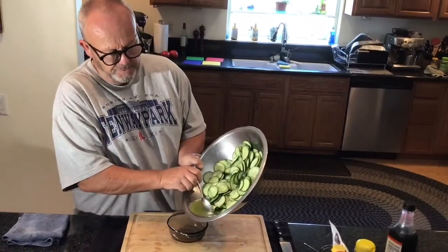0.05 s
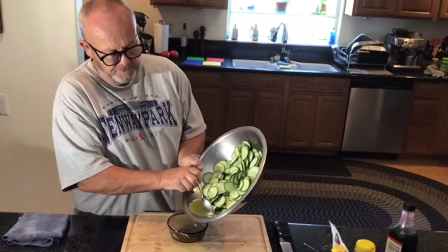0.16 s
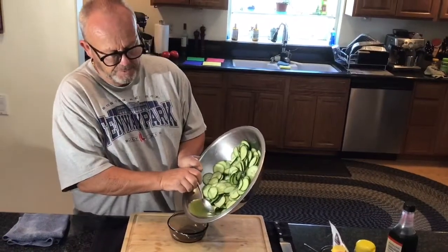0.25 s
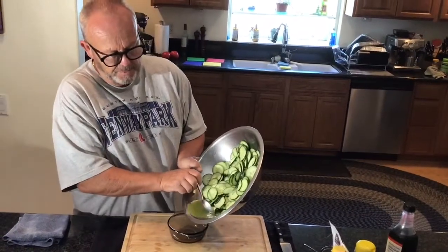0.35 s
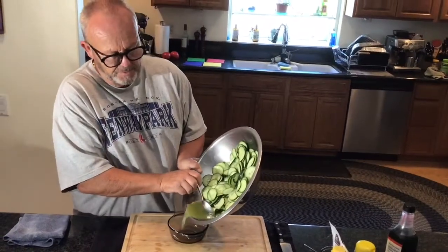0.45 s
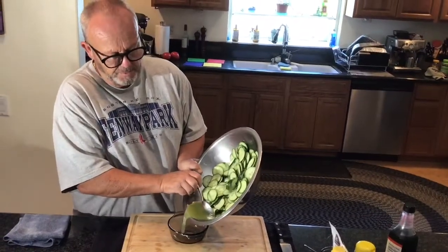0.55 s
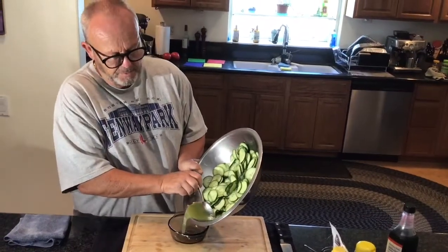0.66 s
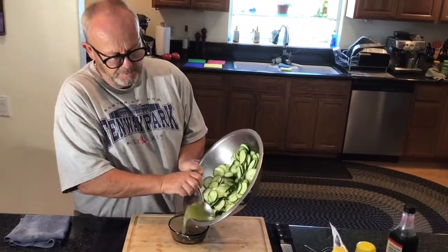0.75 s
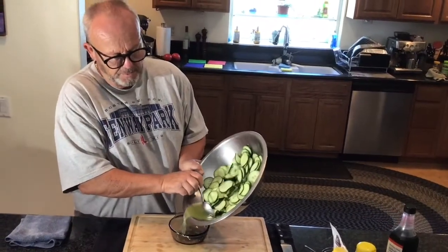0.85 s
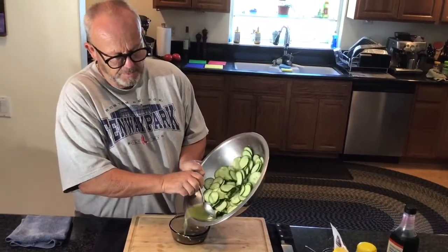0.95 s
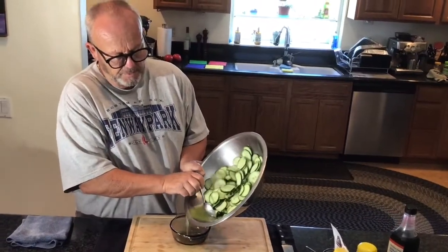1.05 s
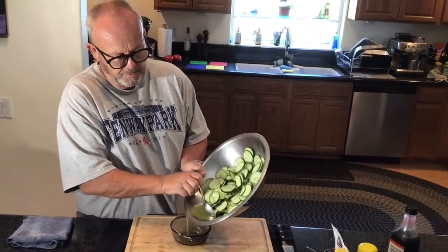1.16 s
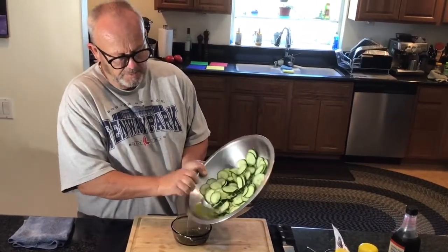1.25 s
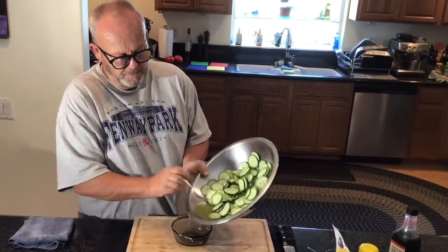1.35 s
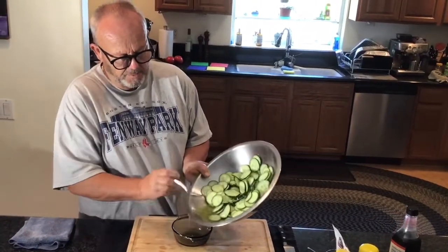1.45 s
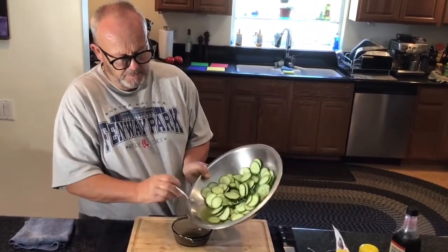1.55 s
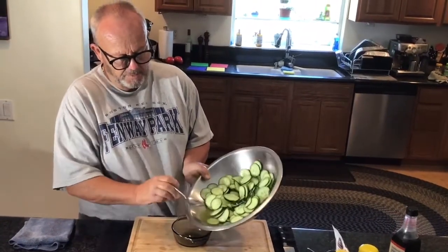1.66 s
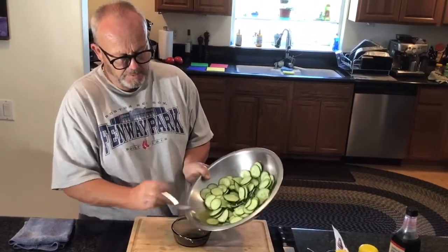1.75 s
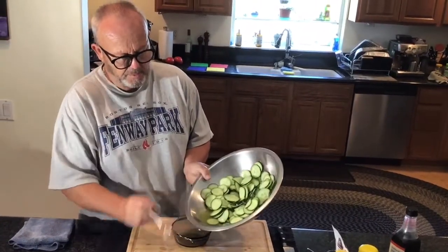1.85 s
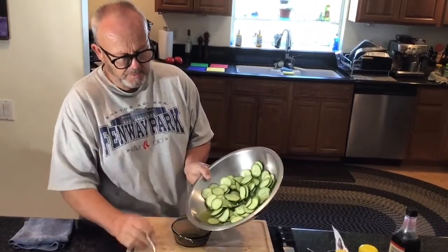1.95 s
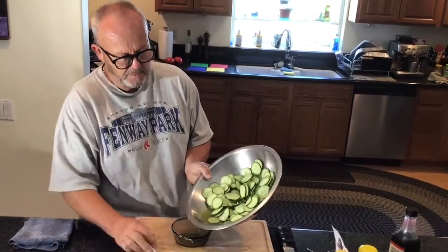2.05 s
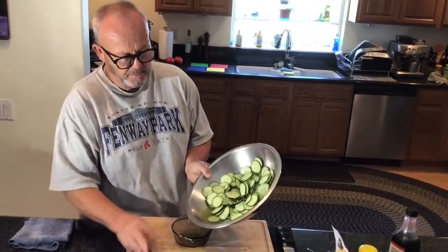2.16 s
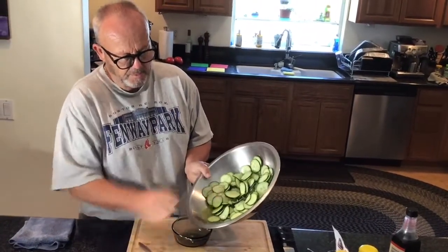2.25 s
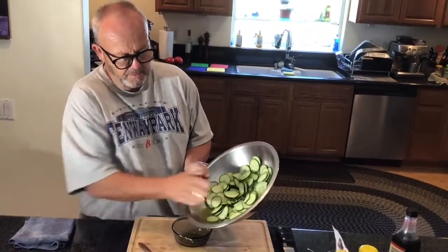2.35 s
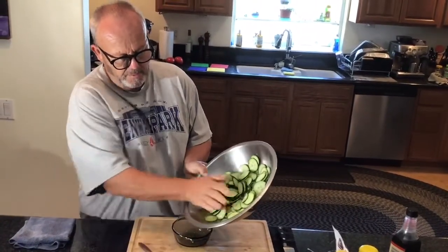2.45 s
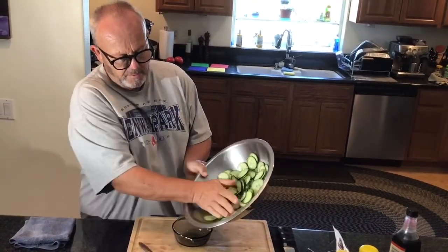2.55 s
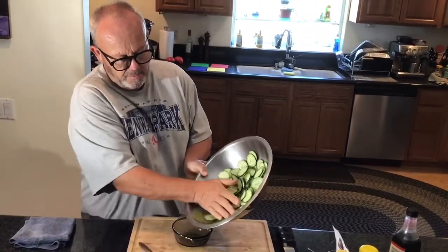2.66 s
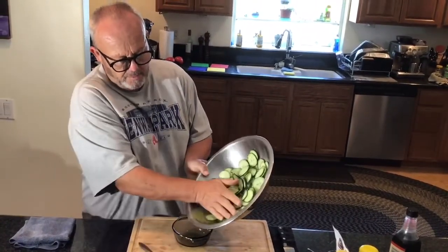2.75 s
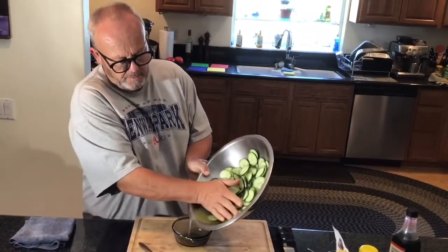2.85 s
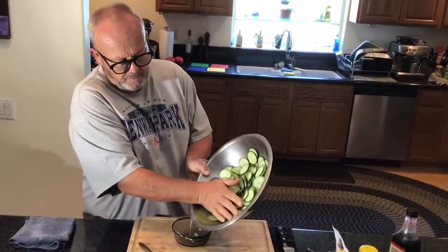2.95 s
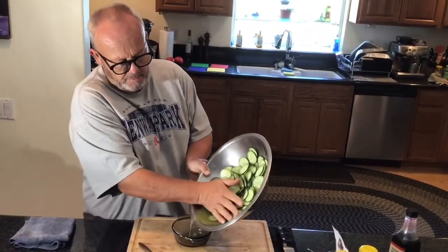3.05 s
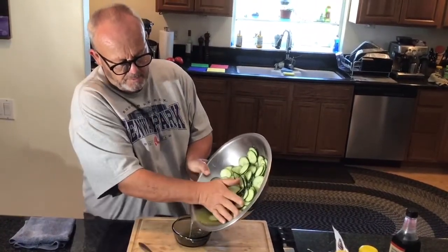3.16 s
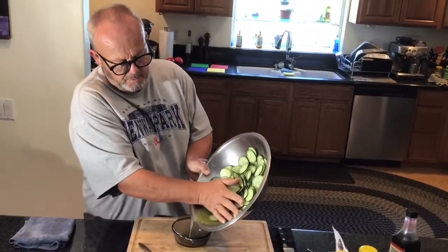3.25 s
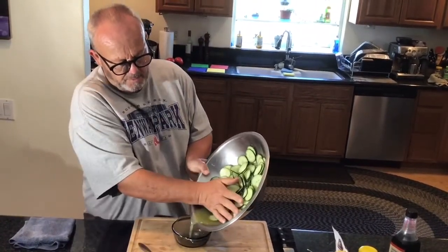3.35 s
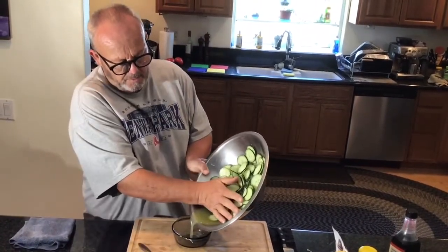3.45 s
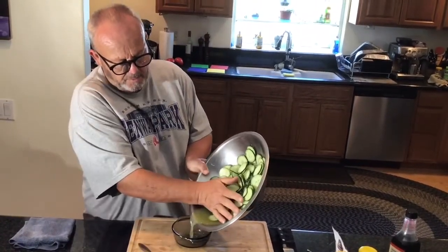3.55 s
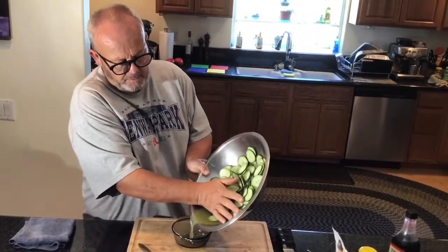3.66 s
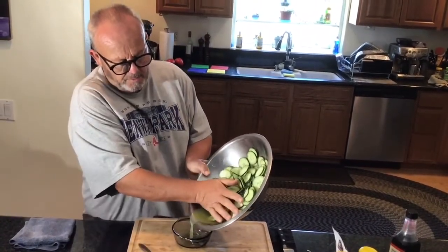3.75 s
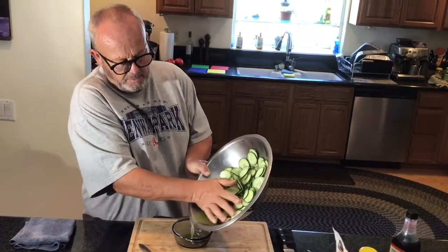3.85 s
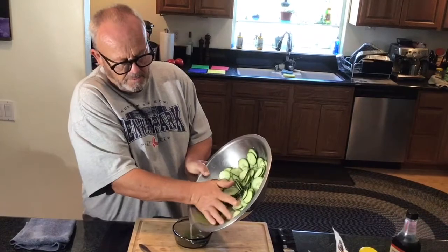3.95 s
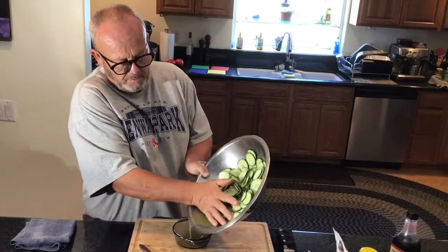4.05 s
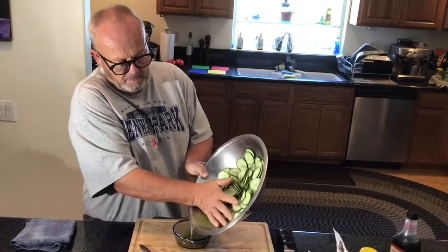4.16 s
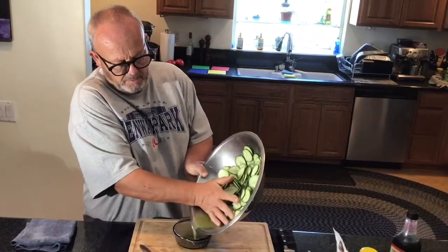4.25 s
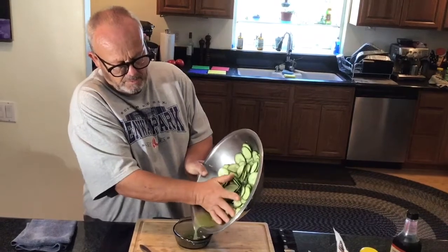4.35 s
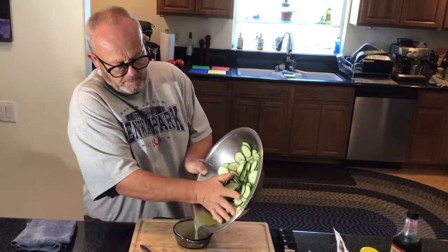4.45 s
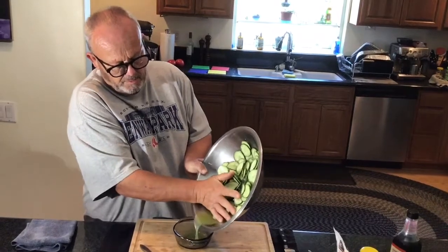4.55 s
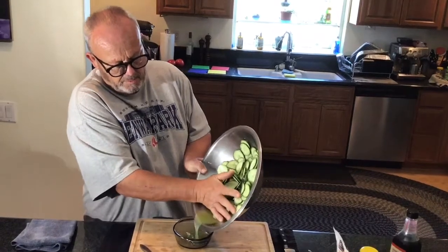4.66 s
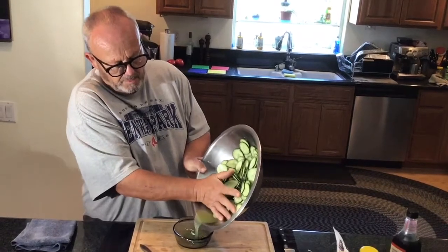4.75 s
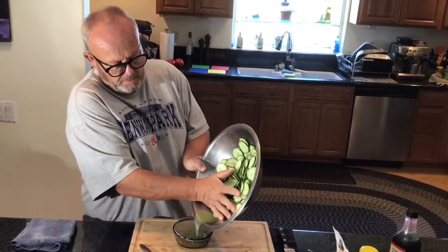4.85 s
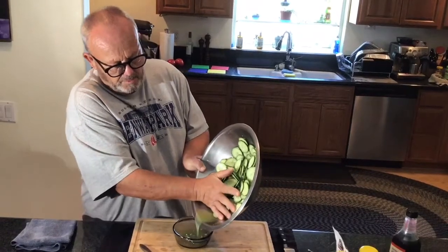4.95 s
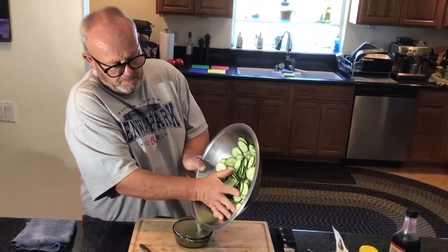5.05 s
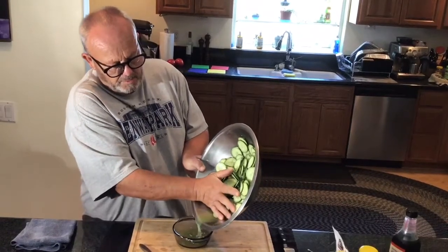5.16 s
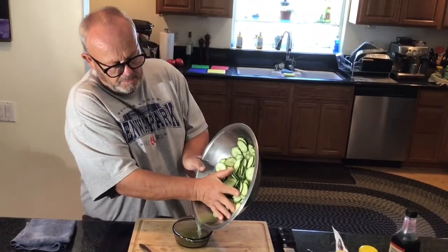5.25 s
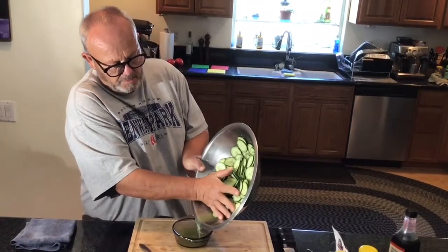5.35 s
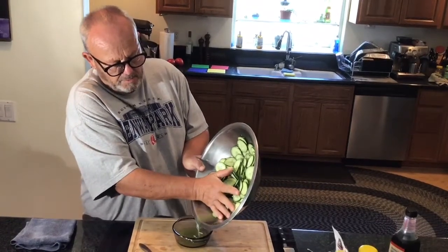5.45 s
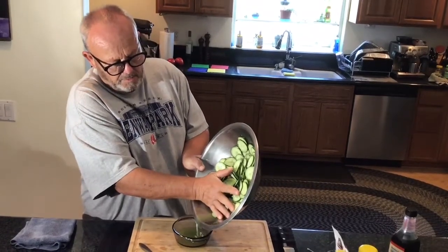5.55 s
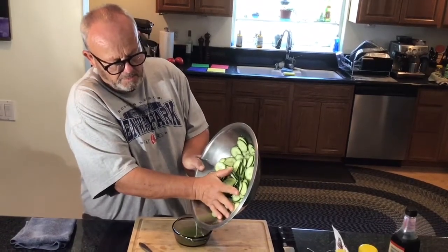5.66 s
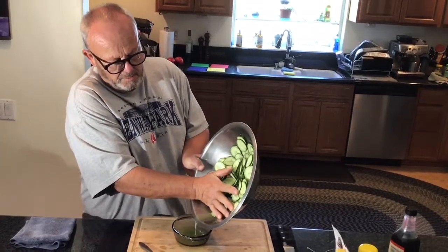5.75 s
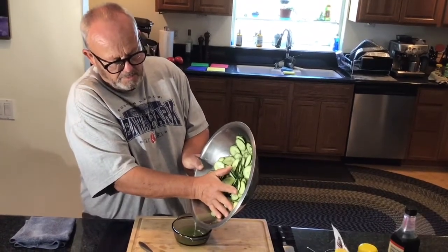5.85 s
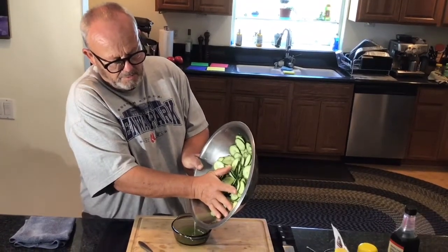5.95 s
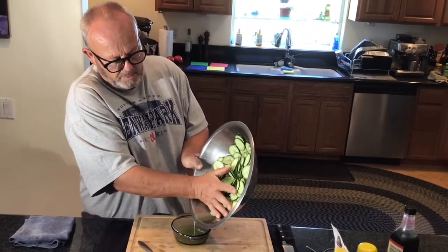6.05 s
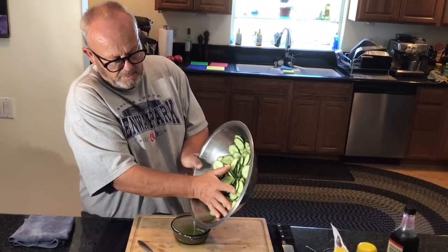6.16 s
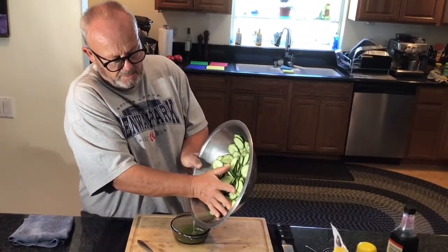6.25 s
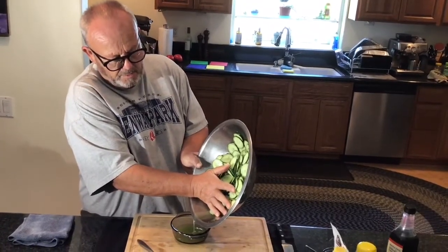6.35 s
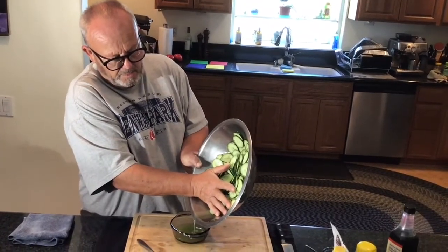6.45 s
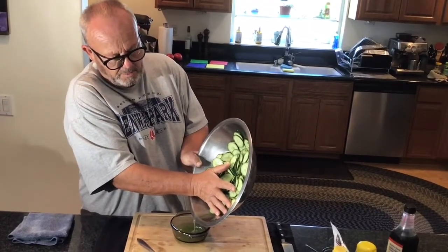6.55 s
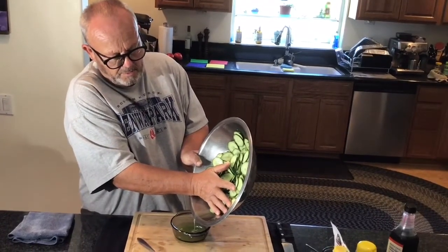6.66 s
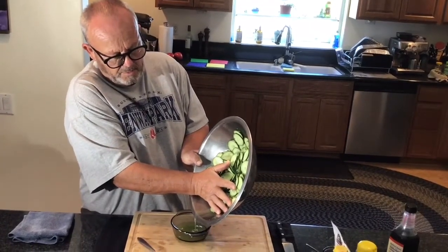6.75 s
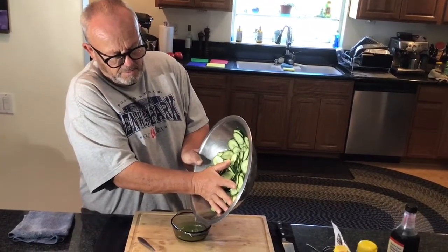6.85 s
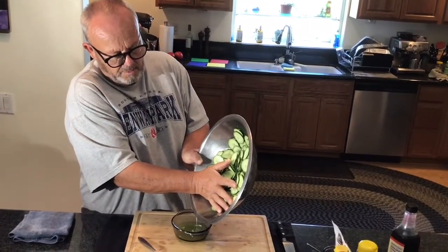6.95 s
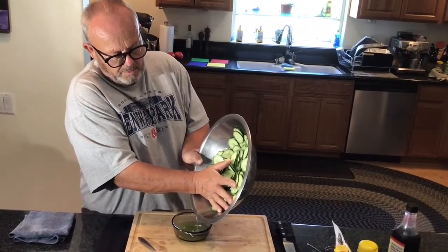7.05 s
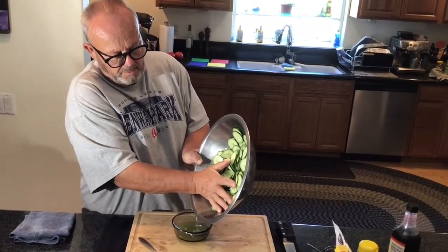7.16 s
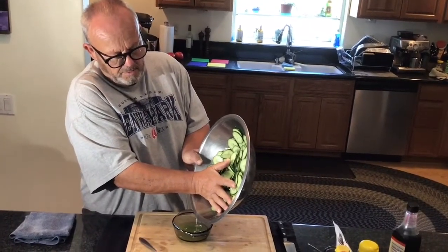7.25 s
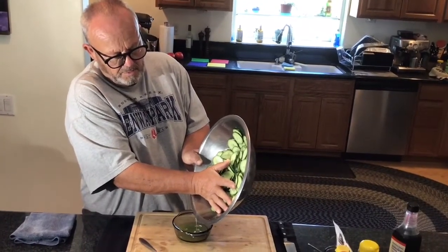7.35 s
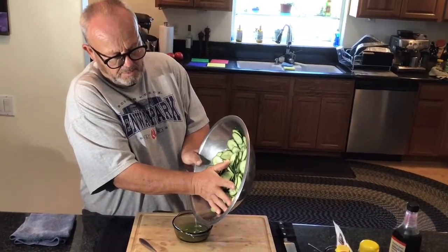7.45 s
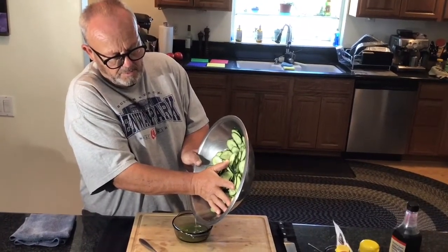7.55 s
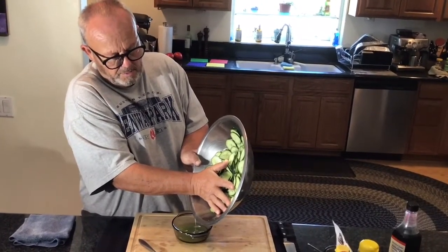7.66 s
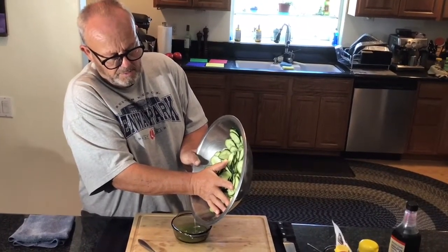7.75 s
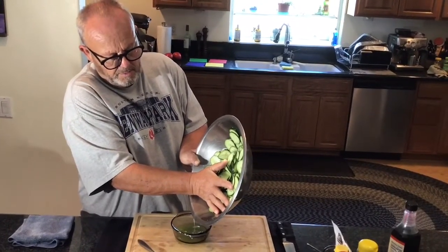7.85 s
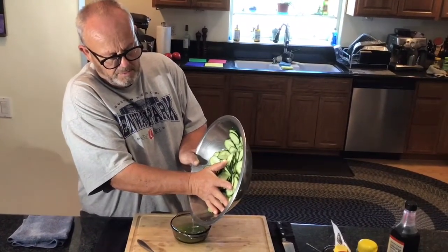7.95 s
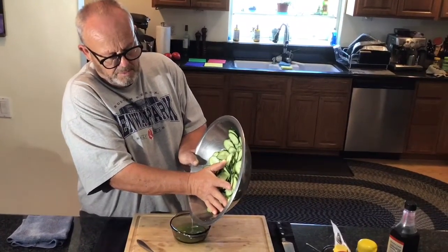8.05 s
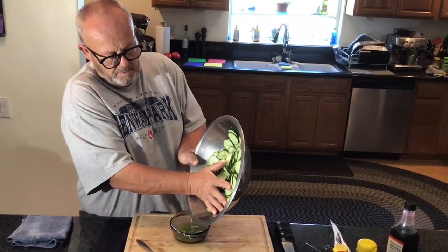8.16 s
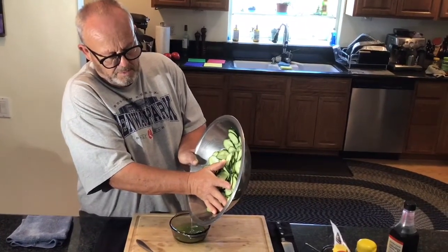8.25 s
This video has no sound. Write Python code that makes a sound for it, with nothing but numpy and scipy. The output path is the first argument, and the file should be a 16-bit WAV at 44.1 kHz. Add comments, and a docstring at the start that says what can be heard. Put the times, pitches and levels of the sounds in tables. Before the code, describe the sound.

Faint drips and a thin trickle into a glass bowl in a quiet kitchen, with one brief, ringing clatter of a fork on wood.

```python
"""Over the hum of an appliance in a quiet kitchen, wet cucumber slices slump in a tilted steel bowl
and brine trickles from it into a small glass bowl. Near 1.8 s a metal fork is put down on a wooden
cutting board: one end knocks, the other falls and rattles, and the fork's modes ring on.
Then, as a hand holds the slices back, drops splat, or tick and trap tiny bubbles that resonate."""
import sys
import numpy as np
from scipy import signal
from scipy.fft import rfft, irfft, next_fast_len
from scipy.io import wavfile

SR = 44100
rng = np.random.default_rng(int(sys.argv[2]) if len(sys.argv) > 2 else 0)


def transcribe(signal):
    """Save signal, clipped to [-1, 1], as a 16-bit WAV file at the path in sys.argv[1]."""
    frames = np.atleast_2d(signal).T
    limited = np.clip(frames, -1, 1)
    pcm = np.round(limited * 32767).astype(np.int16)
    wavfile.write(sys.argv[1], SR, pcm)


N = 366515

# larger drops landing in the glass bowl: t/s, bubble f/Hz, bubble level/dB, tick level/dB
DROPS = [(.006, 3780, -56, -75), (.344, 2320, -59, -62.5), (.818, 9030, -65, -65.5),
         (3.715, 1555, -63.5, -74), (3.796, 4040, -58.5, -74), (3.852, 5300, -61.5, -74),
         (3.869, 6880, -54, -53), (4.153, 5180, -63, -74), (4.511, 8240, -64.5, -63.5),
         (4.645, 2685, -68, -80), (4.802, 5100, -63, -70), (4.816, 8200, -59.5, -59.5),
         (4.833, 3870, -64, -65), (4.929, 8530, -61.5, -67), (4.948, 4650, -65.5, -74),
         (5.14, 3410, -69, -76.5), (5.234, 1608, -64, -80), (5.402, 4820, -60.5, -64),
         (6.145, 2080, -69, -72), (6.231, 1685, -64.5, -78), (6.477, 2180, -69, -78),
         (6.932, 4110, -63.5, -68.5), (7.1117, 4740, -54, -58), (7.22, 2560, -62, -70),
         (7.2208, 4220, -57, -62), (7.24, 8860, -64, -55), (7.257, 6050, -60, -59),
         (7.458, 4780, -63.5, -65), (7.508, 6900, -63, -59), (7.674, 2430, -69.5, -80),
         (7.697, 7300, -60, -58.5), (7.889, 5000, -57, -63), (7.957, 5620, -64, -62)]
# strength of the trickle: t/s, level/dB of its small bubbles
FLOW = [(0, -72), (.5, -96), (1.3, -92), (3.4, -92), (3.8, -78), (4.1, -80), (4.8, -76.5), (5.4, -73.5),
        (5.8, -93), (6.3, -80), (7, -78.5), (8, -76), (8.31, -81)]


def undb(db):
    """Amplitude ratio of a level in decibels."""
    return 10 ** (np.asarray(db) / 20)


def seconds(length):
    """Sampled time axis of the given length."""
    return np.arange(int(length * SR)) / SR


def add(out, at, x):
    """Superposition: x joins out from time at."""
    i = int(np.clip(at * SR, 0, N - 1))
    out[i:i + len(x)] += x[:N - i]


def wander(t, count):
    """Random modulation: count Gaussian values joined by straight lines."""
    return np.interp(t, np.linspace(0, t[-1], count), rng.standard_normal(count))


def noise(spectrum, size):
    """Spectral shaping: noise of rms 1 whose density follows rows of f/Hz, level/dB."""
    hz, db = np.transpose(spectrum)
    padded = next_fast_len(size, True)
    f = np.maximum(np.fft.rfftfreq(padded, 1 / SR), 1)
    gain = undb(np.interp(np.log(f), np.log(hz), db)) * np.minimum(f / hz[0], 1) ** 2
    shaped = irfft(rfft(rng.standard_normal(padded)) * gain, padded)[:size]
    return shaped / np.sqrt(np.mean(shaped ** 2))


def ring(t, hz, t60):
    """Damped oscillation: one mode, falling by 60 dB in t60 seconds."""
    return np.sin(2 * np.pi * hz * t) * np.exp(-np.log(1000) * t / t60)


def background(room_db=-66, waver_hz=1.5):
    """A continuous spectrum of house rumble and hiss lies under an appliance's wavering line spectrum."""
    # room tone: f/Hz, relative spectral level/dB
    room_tone = [(30, -13.5), (55, -2), (104, 1), (195, -9), (240, -5), (300, -10.5), (780, -17),
                 (1500, -26.5), (2500, -31), (3900, -31), (6000, -34.5), (9000, -36), (12000, -40),
                 (15500, -42.5)]
    # hum and whine of the appliance: f/Hz, rms level/dB
    hum = [(70, -80), (120, -81.5), (238, -80), (2595, -90), (3924, -100)]
    t = np.arange(N) / SR
    out = undb(room_db) * noise(room_tone, N)
    for hz, db in hum:
        drift = waver_hz * wander(t, count=60)
        out += undb(db) * np.sqrt(2) * np.sin(2 * np.pi * np.cumsum(hz + drift) / SR)
    return out


def kitchen(x, wet_db, t60_low=.46, t60_high=.38, gap_s=.003, build_s=.0024, treble_db=-1, early_s=.015):
    """Reverberation: counter and cupboards reflect first, then the walls; the treble decays sooner."""
    t = seconds(.7)
    white = rng.standard_normal(len(t))
    low = signal.sosfiltfilt(signal.butter(2, 5000, fs=SR, output="sos"), white)
    low_decay = undb(-60 * t / t60_low)
    tail = low * low_decay + undb(treble_db) * (white - low) * undb(-60 * t / t60_high)
    onset = 1 - np.exp(-np.maximum(t - gap_s, 0) / build_s)
    early_boost = 1 + .74 * np.exp(-t / early_s)
    response = tail * onset * early_boost / np.sqrt(np.sum(low_decay ** 2))
    return x + undb(wet_db) * signal.fftconvolve(x, response)[:N]


def splats(events, below_db=-18, above_db=-8):
    """Brief wet impacts have broad spectra: decaying noise bursts, higher for finer spray."""
    out, t = np.zeros(N), seconds(.07)
    for at, db, decay_s, hz in events:
        colour = [(hz / 3.2, below_db), (hz / 1.1, -2), (hz, 0),
                  (hz * 2, above_db), (hz * 4, 2 * above_db), (hz * 16, 4 * above_db)]
        add(out, at, undb(db - 1.5) * noise(colour, len(t)) * np.exp(-t / decay_s))
    return out


def wet_impacts(edge_db=-6, edge_s=.0028, edge_hz=8500):
    """Soft impacts: slices shift and slump early on; later, drops splat without a ringing bubble."""
    # wet smacks and splashes: t/s, level/dB, decay time/s, centre f/Hz
    smacks = [(.002, -64.5, .022, 3980), (.333, -62, 0.018, 3230), (.362, -66, .008, 3500),
              (1.2023, -49, 0.0036, 2670), (3.785, -67.5, .004, 11000), (4.416, -68.5, 0.0049, 2100),
              (5.4, -66, .012, 2580), (6.497, -67.5, .003, 9100), (6.599, -63, 0.0055, 13000),
              (6.875, -66.5, .004, 5500), (7.841, -61, .0027, 10900), (7.87, -61.5, .006, 3170),
              (8.265, -70, .009, 3360)]
    # dull slumps of slices in the steel bowl: t/s, level/dB, decay time/s, centre f/Hz
    slumps = [(.002, -62, 0.011, 520), (.310, -59, 0.0088, 720)]
    edges = [(at, db + edge_db, edge_s, edge_hz) for at, db, _, _ in smacks]
    smacking = splats(smacks, below_db=-24, above_db=-11.5) + splats(edges)
    return smacking + splats(slumps, below_db=-14, above_db=-29)


def bubble(hz, t60, rise=.02):
    """Bubble resonance: trapped air pulsates, rising in pitch as it nears the surface."""
    t = seconds(t60)
    return ring(t, hz * (1 + rise * t / t60), t60)


def trickle(count=1700, centre_hz=3900, octaves=.75, spread_db=3, cycles=40):
    """Air entrainment: the thin stream makes bubbles of many sizes; smaller ones tend to die sooner."""
    out, times = np.zeros(N), rng.uniform(0, N / SR, count)
    height, strength, life = rng.standard_normal((count, 3)).T
    pitches = np.clip(centre_hz * 2 ** (octaves * height), 1400, 14000)
    levels = np.interp(times, *np.transpose(FLOW)) + spread_db * np.minimum(strength, 2)
    ring_times = cycles / pitches * np.exp(.5 * life)
    for at, hz, db, t60 in zip(times, pitches, levels, ring_times):
        add(out, at, undb(db) * bubble(hz, t60))
    return out


def spatter(count=70, over_flow_db=5, spread_db=2, stray_s=.0035, stray_hz=8500, octaves=.68,
            tick_s=.0021, tick_hz=8000):
    """Impact noise: each larger drop ticks, and stray droplets tick as strongly as the stream runs."""
    times = (np.arange(count) + rng.uniform(0, 1, count)) * N / SR / count
    strength, height = np.clip(rng.standard_normal((count, 2)).T, -2, 2)
    levels = np.interp(times, *np.transpose(FLOW)) + over_flow_db + spread_db * strength
    centres = stray_hz * 2 ** (octaves * height)
    strays = [(at, db, stray_s, hz) for at, db, hz in zip(times, levels, centres)]
    ticks = [(at, db, tick_s, tick_hz) for at, _, _, db in DROPS]
    return splats(ticks + strays)


def glass(x):
    """Forced vibration: the glass bowl resonates faintly with what lands in it."""
    # bowl modes, damped by the liquid: f/Hz, bandwidth/Hz, level/dB
    modes = [(2480, 45, 3.5), (4930, 75, 8)]
    return x + sum(undb(db) * signal.lfilter(*signal.iirpeak(hz, hz / width, fs=SR), x)
                   for hz, width, db in modes)


def drips(reference_hz=4400, reference_t60=.036, satellites=3, satellite_db=-7.5, mean_lag_s=.011):
    """Air entrapment: a larger drop leaves one ringing bubble, then a few brief ones of like size."""
    out = np.zeros(N)
    for at, hz, db, _ in DROPS:
        t60 = reference_t60 * (reference_hz / hz) ** .46  # smaller, higher bubbles die sooner
        add(out, at, undb(db) * bubble(hz, t60))
        lags = rng.exponential(mean_lag_s, satellites)
        pitches = hz * 2 ** (.17 * rng.standard_normal(satellites))
        for lag, pitch in zip(lags, pitches):
            add(out, at + lag, undb(db + satellite_db) * bubble(pitch, t60=.018))
    return out


def contacts(rebound_s=.003, rattle_start_s=1.996, gap_s=.0148, hold_s=.053, fade_db_per_s=290):
    """Elastic rebound: each blow repeats more weakly; then the fork rocks at an even pace and settles."""
    # blows of the fork on the board: t/s, then level/dB of knock, thud, crack, ring, tines, overtones;
    # thud is relative to knock, tines and overtones to ring
    blows = [(1.8172, -12.5, -5, -31, -42.5, -2, -10.5), (1.9557, -35, 19.5, -27, -29, -23, -7.5),
             (1.968, -22, -6, -35, -54, -7, 0), (1.9725, -45, 12, -32, -44, 4, 7.5)]
    rebounds = [(at + rebound_s, knock - 15, thud, crack - 3.5, ringing - 3.5, tines, overtones)
                for at, knock, thud, crack, ringing, tines, overtones in blows]
    rattle = []
    for since in gap_s * np.arange(8):
        at = rattle_start_s + since
        fade = fade_db_per_s * max(since - hold_s, 0)
        tines = 10.5 - 600 * abs(at - 2.011)  # the tines ring most while they bear the rocking
        rattle.append((at, -38.5 - fade, 7, -35.5 - fade, -41 - fade, tines, -8.5))
    return np.vstack([blows, rebounds, rattle])


def knocks(thud_below_hz=950, crack_s=.005, radiate_hz=170):
    """Impulse excitation: each contact cracks and rings the board; a flat landing favours low modes."""
    # modes of the wooden board: f/Hz, level/dB, t60/s
    board = [(262, -17.5, 0.085), (470, -18.5, .09), (540, -13.5, .06), (632, -14, .07),
             (785, -11.5, 0.046), (1150, -8, 0.035), (1360, -10, .05), (1502, -5.5, 0.045),
             (1626, -14, 0.034), (1940, -13, .03), (2114, -1.5, 0.045), (2230, -5, 0.032), (2369, -8, .03),
             (2880, -10, 0.024), (3220, -10, 0.026)]
    # crack of metal on wood: f/Hz, relative spectral level/dB
    crack_spectrum = [(120, -30.5), (260, -7.5), (600, 3.5), (1000, -4.5), (2200, 2), (3600, -2),
                      (5500, -12), (8000, -19.5), (12000, -29.5), (16000, -32)]
    out, t = np.zeros(N), seconds(.09)
    modes = np.array([(-1) ** k * undb(db) * ring(t, hz, t60) for k, (hz, db, t60) in enumerate(board)])
    is_low = np.array(board)[:, 0] < thud_below_hz
    for at, knock_db, thud_db, crack_db, *_ in contacts():
        wood = undb(thud_db * is_low) @ modes
        crack = noise(crack_spectrum, len(t)) * np.exp(-t / crack_s)
        add(out, at, undb(knock_db - 5) * wood + undb(crack_db) * crack)
    # a small board radiates hardly any bass
    return signal.sosfilt(signal.butter(2, radiate_hz, "high", fs=SR, output="sos"), out)


def fork(scatter_db=2, tine_hz=5500, overtone_hz=7500, rock_db=3, rock_radians=.55,
         rest_s=2.17, damp_db_per_s=55):
    """Energy summation: each contact feeds the fork's modes; rocking modulates their level and phase."""
    # modes of handle and tines: f/Hz, level/dB, t60/s
    modes = [(803, -16, .22), (1374, -11.5, 0.26), (1530, -16, 0.17), (2100, -12.5, 0.22),
             (2670, -17.5, 0.28), (2920, -12.5, 0.34), (3279, -10.5, .25), (4163, -16.5, 0.18),
             (4443, -15, .24), (4930, -3, 0.26), (6084, -1.3, 0.14), (8812, -19, 0.25), (9355, -14.5, 0.41),
             (10400, -16.5, .2), (10607, -10.5, 0.22), (13810, -15.5, .22), (14020, -21.5, .22),
             (15060, -19.5, .18), (15620, -25, .18)]
    out, t = np.zeros(N), seconds(.7)
    at, *_, ring_db, tine_db, overtone_db = contacts().T
    since = t - (at - at[0])[:, None]
    # once the fork lies flat, the board damps it
    damping = undb(-damp_db_per_s * np.maximum(at[0] + t - rest_s, 0))
    for hz, db, t60 in modes:
        share_db = overtone_db if hz > overtone_hz else tine_db if hz > tine_hz else 0
        fed = undb(ring_db + db + share_db + scatter_db * rng.standard_normal(len(at))) ** 2
        remaining = (since >= 0) * np.exp(-2 * np.log(1000) * np.abs(since) / t60)
        energy = fed @ remaining
        waver = undb(rock_db * wander(t, count=55))
        phase = 2 * np.pi * hz * t + rock_radians * wander(t, count=55)
        add(out, at[0], np.sqrt(energy / 2) * damping * waver * np.sin(phase))
    return out


def scene():
    """Superposition in one room; the bowls throw the liquid's sound upward, so it reverberates most."""
    liquid = drips() + glass(spatter() + trickle()) + wet_impacts()
    wood = kitchen(knocks(), wet_db=-3)
    metal = kitchen(fork(), wet_db=-6.5, t60_low=.57, t60_high=.36)
    return (wood + metal + kitchen(liquid, wet_db=-1) + background())[None]


def record(dry, bottom_hz=42, top_hz=15800):
    """Band limiting: steep filters remove the deepest bass and the highest treble."""
    thin = signal.sosfilt(signal.butter(6, bottom_hz, "high", fs=SR, output="sos"), dry)
    return signal.sosfilt(signal.ellip(10, .2, 70, top_hz, fs=SR, output="sos"), thin)


dry = scene()
out = record(dry)
transcribe(out)
```